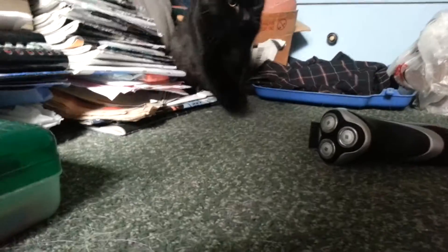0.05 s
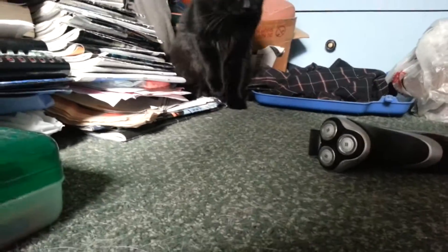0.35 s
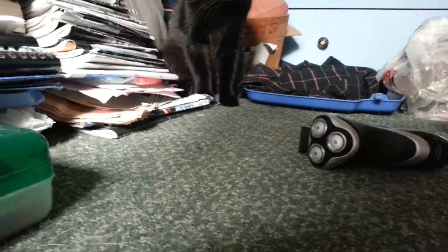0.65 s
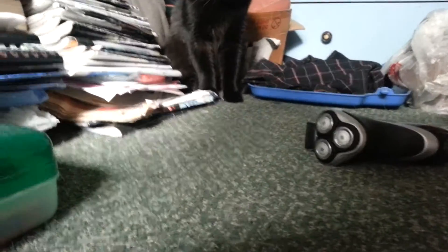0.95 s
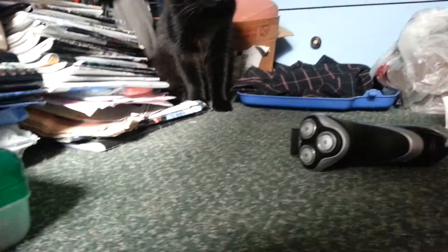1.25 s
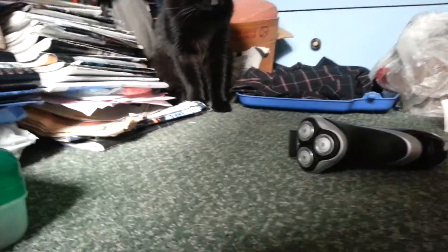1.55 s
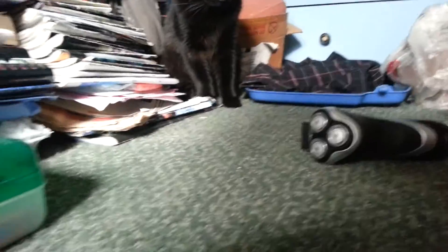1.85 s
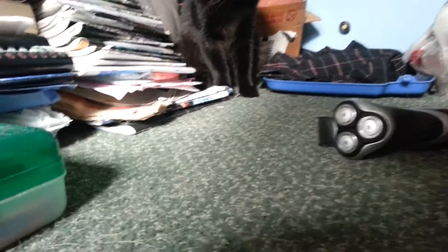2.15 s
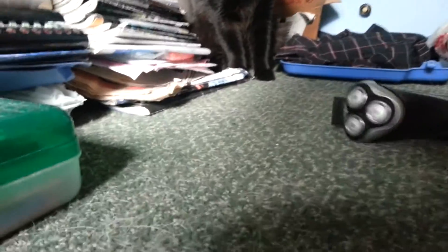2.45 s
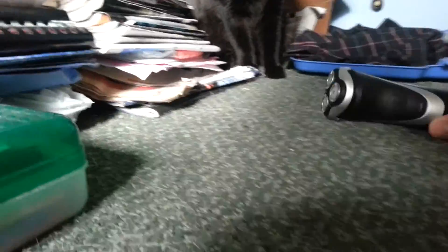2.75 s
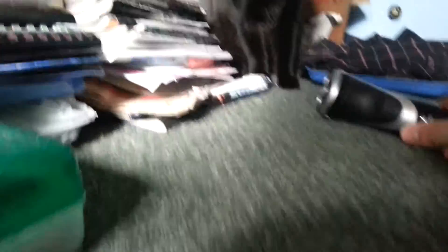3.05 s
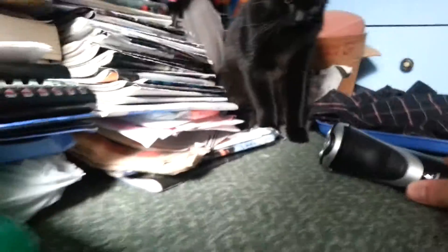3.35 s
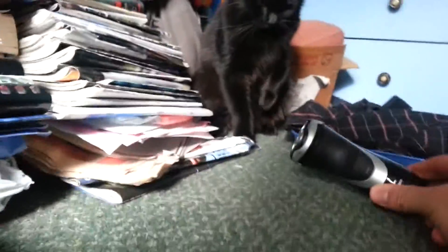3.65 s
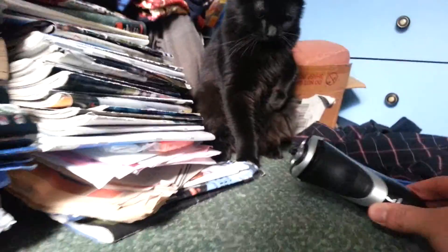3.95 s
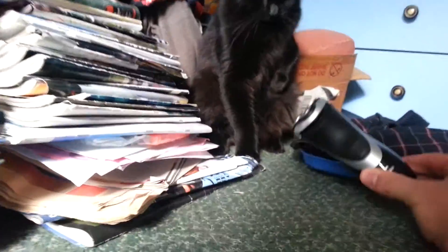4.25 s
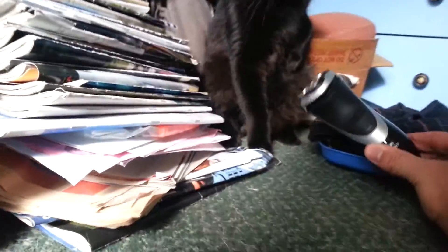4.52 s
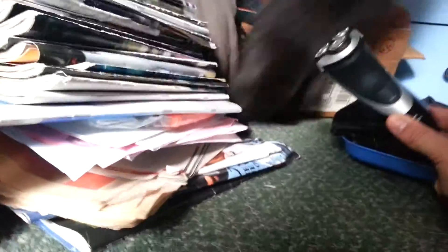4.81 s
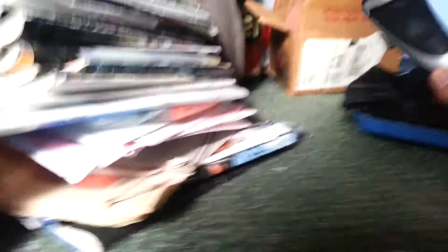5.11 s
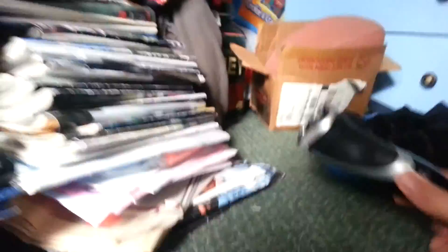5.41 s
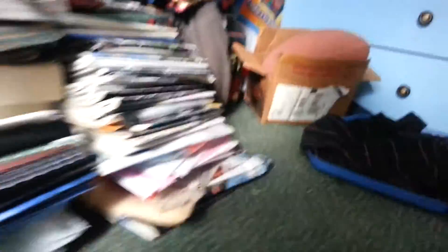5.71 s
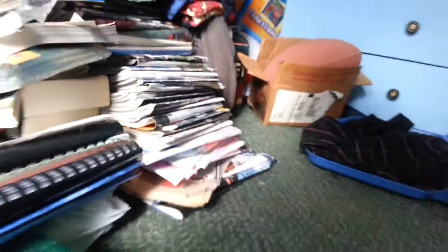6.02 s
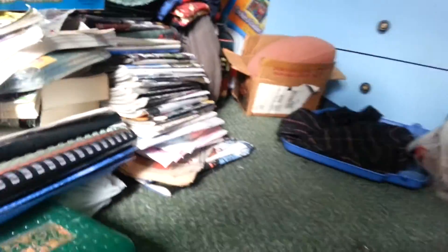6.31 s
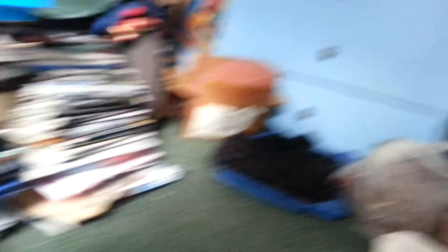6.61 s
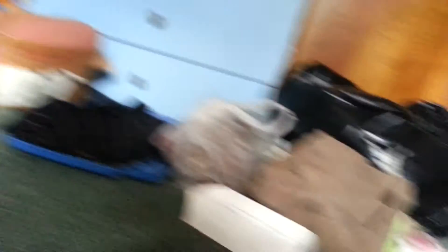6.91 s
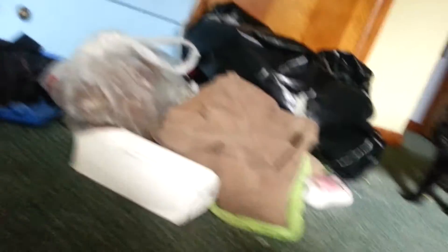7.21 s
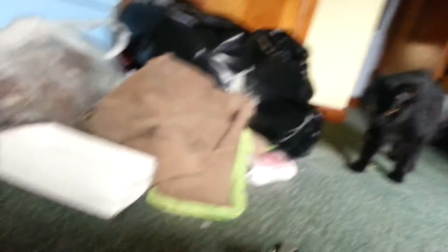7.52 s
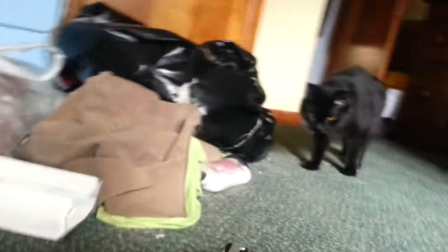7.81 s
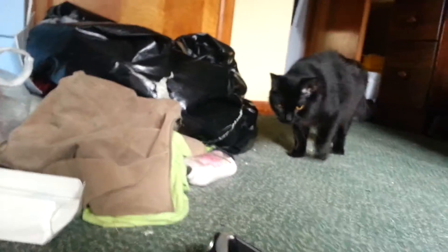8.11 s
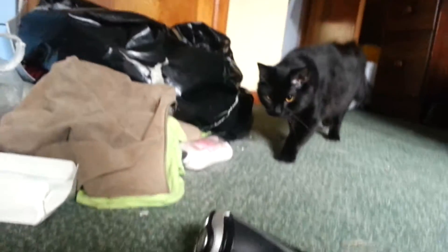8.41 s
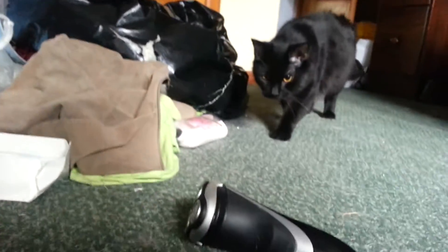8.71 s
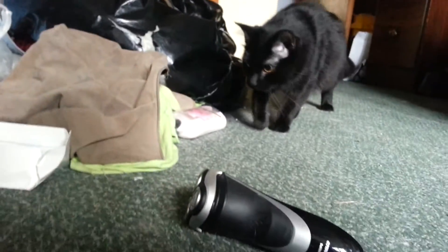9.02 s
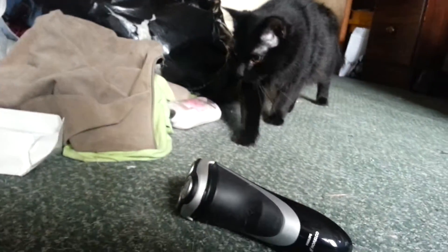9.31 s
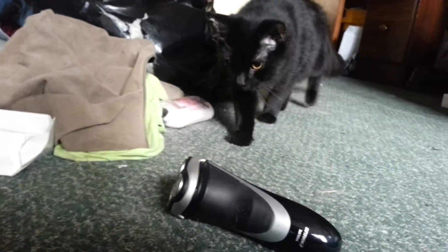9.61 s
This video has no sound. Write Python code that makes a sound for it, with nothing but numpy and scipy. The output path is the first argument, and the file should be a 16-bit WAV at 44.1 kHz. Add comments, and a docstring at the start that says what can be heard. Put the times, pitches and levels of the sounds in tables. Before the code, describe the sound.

A raspy electric shaver runs, gets louder after a clatter of close knocks, and stops, followed by soft swishes and handling clicks.

```python
"""A rotary shaver buzzes on a carpet in a small cluttered room: its blades catch twice a turn, each catch
a beat and a rasp, while the gears whine and the housing and steel caps ring. It is picked up and held
towards a cat, which pads away. Loud knocks and a scrape jolt the microphones; the shaver passes close by
and is switched off. A low room hum, soft swishes and a few small handling clicks remain."""
import sys
import numpy as np
from scipy import signal
from scipy.fft import rfft, irfft, next_fast_len
from scipy.io import wavfile
from scipy.ndimage import map_coordinates

SR = 44100
rng = np.random.default_rng(int(sys.argv[2]) if len(sys.argv) > 2 else 0)


def master(y):
    """Save y as 16-bit WAV."""
    cut = np.clip(np.atleast_2d(y).T, -1, 1)
    pcm = np.round(cut * 32767)  # scale
    wavfile.write(sys.argv[1], SR, pcm.astype(np.int16))


N = 426006
TIME = np.arange(N) / SR


def gain_of(db):
    """Decibels to gain."""
    return 10 ** (np.asarray(db) / 20)


def unit_rms(x):
    """Scales to unit rms."""
    return x / np.sqrt(np.mean(x ** 2) + 1e-20)


def eq_at(points, hz):
    """Reads a spectrum table on a log-frequency axis."""
    f, value = np.transpose(points)
    return np.interp(np.log(hz + 1), np.log(f + 1), value)


def curve(rows, column=1):
    """One column of an automation table at every sample."""
    columns = np.transpose(rows)
    return np.interp(TIME, columns[0], columns[column])


def drift(rate):
    """Random wander of unit size, with `rate` new values a second."""
    return unit_rms(np.interp(TIME * rate, np.arange(N), rng.standard_normal(N)))


def swells(movements):
    """Envelope of movements that rise, hold and fade; where they overlap, their powers add."""
    power = np.zeros(N)
    for start_s, rise_s, hold_s, fade_s, db in movements:
        age = TIME - start_s
        fade = np.exp(-np.maximum(age - rise_s - hold_s, 0) / fade_s)
        power += (gain_of(db) * np.clip(age / rise_s, 0, 1) * fade) ** 2
    return np.sqrt(power)


def add(mix, s, sound):
    """Mixes a stereo sound in at time s."""
    part = mix[:, round(s * SR):][:, :sound.shape[1]]
    part += sound[:, :part.shape[1]]


def delayed(x, delay_s):
    """One channel through a moving delay."""
    return map_coordinates(x, [(TIME - delay_s) * SR], order=3)


def highpass(x, hz):
    """Third-order low cut."""
    return signal.sosfilt(signal.butter(3, hz, "high", fs=SR, output="sos"), x)


def colour(x, db_at, size=4096):
    """Minimum-phase EQ whose gain in dB is the function db_at of frequency."""
    hz = abs(np.fft.fftfreq(size, 1 / SR))
    log_gain = np.log(gain_of(np.maximum(db_at(hz), -100)))
    taps = np.fft.ifft(np.exp(signal.hilbert(log_gain).conj())).real
    return signal.oaconvolve(x, taps[None], axes=1)[:, :x.shape[1]]


def ring(x, hz, width_hz):
    """One steady resonance."""
    return signal.lfilter(*signal.iirpeak(hz, hz / width_hz, SR), x)


def gliding_ring(x, hz, widths_hz):
    """A moving resonance: shift its centre down to zero, smooth once for each width, and shift back."""
    carrier = np.exp(2j * np.pi * np.cumsum(hz) / SR)
    band = x * carrier.conj()
    for pole in np.exp(-np.pi * np.array(widths_hz) / SR):
        band = signal.lfilter([1 - pole], [1, -pole], band)
    return 2 * (carrier * band).real


# Stereo image of the noises. Each row: frequency in Hz, left-right correlation.
STEREO_LIKENESS = [(30, .7), (90, .96), (200, .94), (450, .6), (1000, .1), (4000, .1), (12000, .03)]
def noise(tone):
    """Coloured noise at two microphones, centred in the bass and wide in the treble."""
    size = next_fast_len(N)
    hz = np.fft.rfftfreq(size, 1 / SR)
    mid, side = rfft(rng.standard_normal((2, size)))
    likeness = eq_at(STEREO_LIKENESS, hz)
    mid, side = mid * np.sqrt(1 + likeness), side * np.sqrt(1 - likeness)
    spectrum = np.array([mid + side, mid - side]) * gain_of(eq_at(tone, hz))
    return unit_rms(irfft(spectrum, size)[:, :N])


def room(x, t60_s=0.12, size=12000):
    """Carpet and clutter leave a short, sparse tail."""
    t = np.arange(size) / SR
    echoes = rng.standard_normal((2, size)) * (rng.random((2, size)) < .05)
    taps = echoes * (t > .003) * gain_of(-60 * t / t60_s)
    return signal.oaconvolve(x, taps / np.linalg.norm(taps[0]), axes=1)[:, :N]


# Colour of the room's air. Each row: frequency in Hz, gain in dB.
AIR_TONE = [(15, -55.5), (25, -64), (63, -5.5), (134, -10.5), (184, -5), (358, -8), (480, -16.5),
            (1550, -18.5), (4380, -21), (6350, -25.5), (13000, -23.5), (14500, -30)]
# The hum comes up as the microphones are raised. Each row: time in seconds, level in dB.
HUM_LEVEL = [(4.2, -68), (5.8, -60), (9.66, -57)]
def room_tone(air_db=-59.5, hum_hz=135, width_hz=20):
    """A bed of faint air and a low, wavering hum of narrow-band noise."""
    hum = ring(ring(noise(AIR_TONE), hum_hz, width_hz), hum_hz, 2 * width_hz)
    return gain_of(air_db) * noise(AIR_TONE) + unit_rms(hum) * gain_of(curve(HUM_LEVEL))


# Dull shuffles on the carpet, swishes as the shaver is lowered, and a rub into the sharpest click.
# Each row: start, rise, hold and fade in seconds, level in dB.
SHUFFLE_MOVES = [(1.08, 0.084, 0.32, 0.079, -53.5), (3.9, 0.57, .1, .1, -51),
                 (4.86, 0.012, 0.082, 0.053, -43), (5.05, 0.067, 0.74, 0.27, -52),
                 (6.9, 0.058, 0.046, 0.2, -57.5), (8.85, 0.26, 0.054, 0.14, -57)]
SWISH_MOVES = [(6.92, 0.036, 0.023, 0.17, -50), (7.09, 0.083, 0.15, 0.14, -47),
               (7.62, 0.062, 0.051, 0.026, -54)]
RUB_MOVES = [(1.402, .004, 0.014, .01, -43), (1.425, 0.018, 0.014, 0.0028, -36.5)]
# Their colours. Each row: frequency in Hz, gain in dB.
SHUFFLE_EQ = [(40, -39), (100, -11), (170, -3.5), (280, -3), (450, -7), (800, -10.5), (3000, -30)]
SWISH_EQ = [(150, -29), (250, -4), (368, -1.5), (560, 1.5), (1000, -2.5), (2830, -6), (3640, -2),
            (6670, -13), (14000, -25)]
RUB_EQ = [(300, -11), (800, -2), (2000, -3), (4500, 0), (7000, -3), (14000, -9)]
def rustles(stir_running_db=-58, stir_after_db=-63.5, lumps_db=2.0):
    """Light friction: lumpy shuffling over a faint stir, smooth swishes and a crisp rub."""
    stir = gain_of(stir_after_db + (stir_running_db - stir_after_db) * motor_gain())
    lumpy = noise(SHUFFLE_EQ) * unit_rms(gain_of(lumps_db * drift(rate=45)))
    shuffle = lumpy * np.hypot(stir, swells(SHUFFLE_MOVES))
    return shuffle + noise(SWISH_EQ) * swells(SWISH_MOVES) + noise(RUB_EQ) * swells(RUB_MOVES)


# Two strokes across the microphones. Each row: start, rise, hold and fade in seconds, gain in dB.
SCRAPE_STROKES = [(5.23, 0.018, 0.058, 0.08, -19.5), (5.358, 0.026, 0.11, 0.042, -15)]
# Colour of the grains. Each row: frequency in Hz, gain in dB.
SCRAPE_EQ = [(30, -39), (80, -4), (130, -4), (195, 6), (260, -0.5), (400, 0.5), (640, -1), (950, -1.5),
             (1600, -4), (2500, -0.5), (4500, -1), (6500, -6), (14000, -8)]
def scrape(bright_hz=1800, dull_hz=382, slows_at_s=5.45, slowing_s=0.011, grain_db=2.0, lag_samples=12):
    """Stick-slip grains that dull as the rubbing slows and reach the right side late."""
    grains = unit_rms(noise(SCRAPE_EQ) * gain_of(grain_db * np.clip(drift(rate=530), -2, 2)))
    hz, t, spectra = signal.stft(grains, SR, nperseg=256)
    speed = (1 - np.tanh((t - slows_at_s) / slowing_s / 2)) / 2
    corner_hz = dull_hz + (bright_hz - dull_hz) * speed
    dulled = spectra / np.sqrt(1 + (hz[:, None] / corner_hz) ** 2)
    left, right = signal.istft(dulled, SR, nperseg=256)[1][:, :N]
    return np.array([left, np.roll(right, lag_samples)]) * swells(SCRAPE_STROKES)


def burst(db, hz, rise_s):
    """A few cycles that swell and die away: a padded thump when low, a steel snap when high."""
    t = np.arange(4000) / SR
    envelope = (t / rise_s * np.exp(1 - t / rise_s)) ** 2
    return gain_of(db) * envelope * np.sin(2 * np.pi * hz * t) * np.ones((2, 1))


def tink(db, hz, t60_s=0.02):
    """A small hard part rings briefly at one pitch."""
    t = np.arange(4000) / SR
    return gain_of(db - 60 * t / t60_s) * np.sin(2 * np.pi * hz * t) * np.ones((2, 1))


def strike(body_db, body_hz, width_hz, crack_db, crack_hz, decay_s, pan_db, snap_db=-17, push_db=-19):
    """A blow with a brief rattle rings a body resonance and a bright crack, over a dull push."""
    t = np.arange(6000) / SR
    rattles = rng.standard_normal((3, len(t))) * np.exp(-t / decay_s) * .12
    blow, wide_rattle = rattles[0] + (t == 0), rattles[1:]
    body = ring(blow + wide_rattle * min(body_hz / 1200, 1), body_hz, width_hz)
    body = ring(body, body_hz, 2 * body_hz)
    body += gain_of(push_db) * ring(blow, hz=300, width_hz=500)
    chatter = blow + 10.0 * wide_rattle
    crack = ring(ring(chatter, crack_hz, width_hz=1300), crack_hz, width_hz=3900)
    crack += gain_of(snap_db) * ring(chatter, hz=6500, width_hz=4900)
    sound = gain_of(body_db) * body / abs(body).max() + gain_of(crack_db) * crack / abs(crack).max()
    return sound * gain_of([[pan_db / 2], [-pan_db / 2]])


# Round thumps on the carpet and the microphones.
# Each row: start in seconds, level in dB, pitch in Hz, rise in seconds.
SOFT_THUMPS = [(0.851, -42, 320, .004), (0.912, -36.5, 313, .004), (4.772, -35, 276, .004),
               (4.865, -38, 237, 0.0041), (4.935, -33, 280, .004), (5.275, -21, 435, 0.0035),
               (5.373, -28, 105, 0.0066), (5.438, -23, 200, 0.0063), (5.502, -19.5, 135, 0.0037),
               (7.03, -40.5, 238, 0.0052), (9.036, -48, 330, .003)]
# Close by, single blade catches snap harder. Each row: start in seconds, level in dB, pitch in Hz.
BLADE_SNAPS = [(5.76, -25, 4380), (5.785, -23, 4440), (5.809, -18, 4560), (6.1545, -26, 4670),
               (6.3764, -25, 3230), (6.4009, -26, 3300), (6.5842, -29, 4420), (6.698, -28, 4580),
               (6.8105, -26, 4430)]
# Knocks on the microphones. Each row: start in seconds, body in dB and Hz, crack in dB and Hz.
HARD_KNOCKS = [(5.242, -13, 1850, -13.5, 4750), (5.2785, -11.5, 1570, -12.5, 2970),
               (5.288, -15, 800, -28, 3000), (5.311, -17.5, 3970, -21, 13300),
               (5.3541, -24, 1020, -15.5, 3680), (5.383, -13.5, 980, -28, 3500),
               (5.394, -10.5, 870, -22, 3500), (5.411, -12.5, 960, -15, 3480),
               (5.441, -13.5, 800, -16, 4020), (5.469, -16, 597, -21, 3500)]
# Small things being handled. Each row: start in seconds, body in dB and Hz, body width in Hz,
# crack in dB and Hz, rattle decay in seconds, left over right in dB, ring in dB and Hz.
HANDLING_CLICKS = [(1.4132, -28, 1000, 600, -16, 3970, 0.002, 3, -44, 4150),
                   (1.4614, -25, 930, 500, -10.5, 4100, 0.0017, 2, -41, 4100),
                   (3.477, -50, 1500, 900, -25, 5940, .001, -3, -42, 5850),
                   (6.953, -23.5, 1430, 700, -24, 4700, 0.0011, 3, -32.5, 1280),
                   (7.038, -42, 1230, 300, -37, 3500, 0.002, -9, -30, 1250),
                   (7.047, -46, 1500, 500, -31.5, 3670, 0.0027, 4, -46, 4350),
                   (7.633, -36.5, 323, 300, -42.5, 3900, 0.0013, 20, -62, 4300),
                   (7.717, -42, 1100, 1000, -46, 2000, 0.0036, 0, -58, 1200),
                   (8.211, -38.5, 795, 900, -64, 2000, 0.0031, 0, -66, 1800),
                   (8.643, -43.5, 400, 400, -44, 4900, 0.0026, 2, -66, 4350),
                   (9.0368, -34.5, 1200, 1200, -36, 4300, 0.00055, 6, -39, 1785),
                   (9.1415, -35, 1280, 1400, -34, 4300, 0.006, -0.5, -40, 4380)]
def impacts(room_db=-8.5):
    """Thumps are all body and blade snaps all crack; knocks and clicks have both."""
    out = np.zeros((2, N))
    for s, *thump in SOFT_THUMPS:
        add(out, s, burst(*thump))
    for s, db, hz in BLADE_SNAPS:
        add(out, s, burst(db, hz, rise_s=.0007))
    for s, body_db, hz, crack_db, crack_hz in HARD_KNOCKS:
        add(out, s, strike(body_db, hz, 0.29 * hz, crack_db, crack_hz, decay_s=0.0031, pan_db=2.5))
    for s, *click, ring_db, ring_hz in HANDLING_CLICKS:
        add(out, s, strike(*click, snap_db=-15.5))
        add(out, s, tink(ring_db, ring_hz))
    return out + gain_of(room_db) * room(highpass(out, 250))


def motor_turns(full_speed_hz=40.529, shortfall_hz=.849, settle_s=2.12):
    """Running count of cutter turns as the motor creeps up to full speed."""
    return np.cumsum(full_speed_hz - shortfall_hz * np.exp(-(TIME / settle_s) ** 2)) / SR


def motor_gain(off_s=6.83, fade_db_per_s=133):
    """Full level until the motor is switched off, then a fast fade."""
    return gain_of(-fade_db_per_s * np.maximum(TIME - off_s, 0))


def hollow_shell(decay_s=.002, direct=.1, size=1600):
    """The shell smears a pulse, differently on each side, and keeps its spectrum flat."""
    decay = np.exp(-np.arange(size) / SR / decay_s)
    smear = unit_rms(rng.standard_normal((2, size)) * decay) / np.sqrt(size)
    smear[:, 0] += direct
    spectrum = rfft(smear)
    return irfft(spectrum / abs(spectrum))[:, :size // 2]


# The two catches in a turn, the main one first. Each row: place in the turn from 0 to 1,
# beat gain in dB, beat low cut in Hz, rasp gain in dB, lead of the rasp in seconds.
BLADE_CATCHES = [(.285, 5, 497, -3, 0.0033), (.82, 3.5, 1620, 1, 0.0013)]
MAIN_CATCH = BLADE_CATCHES[0][0]
def blades(turns, slide_db, jitter_s=.00002, catch_s=0.00087, tick_db=6.5, tick_lag_s=0.00095, alike=0.3):
    """Each catch gives a beat of the same shape and a burst of rasp; the blades slide softly between."""
    beat, power = np.zeros((2, N)), np.zeros(N)
    age = np.arange(SR // 50) / SR / catch_s
    grind_shape = age ** 2 * np.exp(-age) / 2
    for place, beat_db, low_hz, rasp_db, lead_s in BLADE_CATCHES:
        when = np.interp(np.arange(int(turns[-1]) - 2) + place, turns, TIME)
        late, strong, loose, harsh = np.clip(rng.standard_normal((len(when), 4)), -2, 2).T
        at = (when + jitter_s * late) * SR
        force = gain_of(beat_db + 1.5 * strong)
        sample, fraction = at.astype(int), at % 1
        pulses = np.bincount(sample, force * (1 - fraction), N)
        pulses += np.bincount(sample + 1, force * fraction, N)
        beat += signal.oaconvolve(highpass(pulses, low_hz)[None], hollow_shell(), axes=1)[:, :N]
        # the blade starts to grind just before it snaps free, a little differently each turn
        grind_at = abs((when - lead_s + .0003 * loose) * SR).astype(int)
        grinds = np.bincount(grind_at, gain_of(rasp_db + .8 * harsh) ** 2, N)
        power += signal.oaconvolve(grinds, grind_shape)[:N]
    envelope = np.sqrt(abs(power))
    centre = np.sqrt(alike) * rng.standard_normal((3, 1, N))
    grind, caps, slide = centre + np.sqrt(1 - alike) * rng.standard_normal((3, 2, N))
    # only the catches are hard enough to make the steel caps tick, a moment later
    ticks = ring(caps * np.interp(TIME - tick_lag_s, TIME, envelope), hz=4700, width_hz=800)
    return beat, envelope * grind + gain_of(tick_db) * ticks + gain_of(slide_db) * slide


# The grip shifts the housing's ring. Each row: time in seconds, pitch in Hz.
HOUSING_GLIDE = [(5, 1266), (5.7, 1235), (6.5, 1215), (6.72, 1370)]
# Its level as the shaver is turned and gripped. Each row: time in seconds, level in dB.
HOUSING_LEVEL = [(0, -54), (1.1, -49.5), (1.7, -46), (2.3, -48), (2.85, -45), (3.6, -46.5), (4.4, -51),
                 (5.2, -53), (5.7, -50), (6.05, -54), (6.3, -62), (6.5, -53), (6.8, -51)]
def housing(turns, width_hz=34, onset_width_hz=500, spread_db=0.9, lag_samples=7):
    """Each main catch rings the plastic housing: a throbbing whine that reaches the right side late."""
    kicks = np.diff(np.floor(turns - MAIN_CATCH), prepend=-1) * gain_of(spread_db * drift(rate=40))
    whine = unit_rms(gliding_ring(kicks, curve(HOUSING_GLIDE), [width_hz, onset_width_hz]))
    return np.array([whine, np.roll(whine, lag_samples)]) * gain_of(curve(HOUSING_LEVEL)) * motor_gain()


# The caps' song comes and goes with the angle of the head. Each row: time in seconds, level in dB.
CAPS_LEVEL = [(0, -54.5), (1.2, -54), (1.7, -51.5), (2.5, -52), (2.8, -63), (4, -62), (4.4, -55),
              (4.95, -49), (5.2, -56), (5.68, -45), (5.78, -52), (5.9, -49), (6, -58), (6.11, -45),
              (6.21, -58), (6.36, -54), (6.6, -63)]
def steel_caps(rasp, hz=3345, width_hz=70, waver_db=0.5, wander_hz=18):
    """The grinding keeps the thin steel caps singing, wavering in level and pitch."""
    waver = gain_of(waver_db * drift(rate=2.84))
    song = gliding_ring(rasp, hz + wander_hz * drift(rate=4), [width_hz, 2 * width_hz])
    return motor_gain() * gain_of(curve(CAPS_LEVEL)) * waver * unit_rms(song)


# How the shaver is turned. Each row: time in seconds, pose (0 lying, 1 lifted, 2 held out, 3 close by).
POSE_PATH = [(1.1, 0), (2.1, .4), (2.6, 1), (3.05, 1.1), (3.6, 1.8), (4.4, 2), (5.5, 2.05), (5.85, 2.9),
             (6.5, 3), (6.75, 2.1)]
def by_pose(values):
    """Crossfades four values, one for each pose, as the shaver moves."""
    return np.interp(curve(POSE_PATH), np.arange(len(values)), values)


# Gear and motor tones. Each row: multiple of the cutter speed (played rounded to a whole number),
# then level in dB for each of the four poses.
GEAR_TONES = [(12, -58, -60, -61.5, -57.5), (49, -51.5, -59, -72, -75), (51, -53.5, -51, -58, -75),
              (57, -54.5, -74, -61, -55), (61, -54.5, -74, -54, -47.5), (82.5, -50, -53.5, -49, -56)]
def gears(turns, beat_gain, full_above_db=-44.0, waver_db=1.6):
    """Whines locked to the shaft throb together just after the main catch and fade with a weak beat."""
    shaft = turns - MAIN_CATCH - .07 + 0.0012 * drift(rate=25)
    running = np.minimum(beat_gain / gain_of(full_above_db), 1)
    lead_cycles = np.array([[.22], [0]])  # each tone reaches the left side first
    out = np.zeros((2, N))
    for multiple, *levels_db in GEAR_TONES:
        level = gain_of(by_pose(levels_db) + waver_db * drift(rate=15))
        out += running * level * np.sin(2 * np.pi * (round(multiple) * shaft + lead_cycles))
    return out


# Resonances of the shaving head. Each row: centre in Hz, width in Hz, boost or cut in dB.
HEAD_RESONANCES = [(1500, 350, 2.5), (2050, 130, 2.5), (2400, 140, -1), (4300, 100, 1), (4650, 860, -5),
                   (7700, 450, 2), (13600, 870, 14)]
def head_db(hz):
    """The head's resonances as bell-shaped EQ bands."""
    return sum(db / (1 + (2 * (hz - centre) / width) ** 2) for centre, width, db in HEAD_RESONANCES)


# Two sweeping peaks in the rasp. Each row: time in seconds, centre in Hz, gain of the added band in dB.
LOW_SWEEP = [(0, 2000, -29), (1.7, 2000, -9), (2.15, 2100, -12), (2.3, 2650, -10), (2.6, 2730, -3),
             (3.05, 3030, -6), (3.3, 3100, -18), (5.55, 2400, -22), (5.75, 2230, -5), (6.02, 2230, -2),
             (6.07, 3250, -2), (6.2, 3280, -9), (6.37, 3270, 0), (6.48, 3130, 0), (6.62, 3070, -9)]
HIGH_SWEEP = [(0, 4700, -26), (1.9, 4650, -14), (2.3, 4400, 0), (2.8, 4600, -22), (3.7, 4840, -11),
              (4.5, 4860, -3), (5.1, 4300, 1), (5.6, 4400, -9.5), (5.72, 4400, 2), (5.81, 4560, 3),
              (5.87, 4300, -14), (5.95, 4080, -8), (6.04, 4730, -19), (6.13, 4800, -5), (6.27, 4730, -1),
              (6.38, 4300, -4), (6.45, 4100, -12), (6.53, 4150, 1), (6.6, 4550, 2), (6.69, 4600, -14)]
def aimed(x, width_hz=360):
    """The turning head aims two moving bands at the listener."""
    for sweep in LOW_SWEEP, HIGH_SWEEP:
        x = x + gain_of(curve(sweep, 2)) * gliding_ring(x, curve(sweep), [width_hz])
    return x


# Two high shelves. Each row: time in seconds, treble gain in dB, further gain of the top sizzle in dB.
TREBLE_SHELVES = [(0, 1.5, 5.5), (2.5, 3, -0.5), (3.3, 2, -4), (4.702, 0, -2), (4.921, 2.5, 6),
                  (5.1, -2, 0), (5.6, 2, -15), (5.8, 2.5, 4), (6.08, 4.5, 1), (6.22, -2.5, 0),
                  (6.45, 2, -5), (6.8, -2, 2)]
def beamed(x, treble_hz=6000, sizzle_hz=12000):
    """The head beams its treble, so the highest bands swell and fade as it turns."""
    for column, hz in enumerate([treble_hz, sizzle_hz], start=1):
        top = signal.sosfiltfilt(signal.butter(3, hz, "high", fs=SR, output="sos"), x)
        x = x + (gain_of(curve(TREBLE_SHELVES, column)) - 1) * top
    return x


# Bounce off the nearest surface. Each row: time in seconds, delay in seconds, gain in dB.
NEAR_BOUNCE = [(0, 0.0022, -33), (2, 0.0019, -14.5), (3, 0.0014, -36), (4.2, 0.0013, -24),
               (5.95, 0.00084, -19), (6.1, 0.001, -26), (6.28, 0.0015, -12), (6.45, 0.0014, -24),
               (6.6, 0.0012, -7), (6.8, 0.0015, -21)]
def reflected(x):
    """One reflection, whose path changes as the shaver moves, combs the buzz with shifting peaks."""
    bounce = np.array([delayed(side, curve(NEAR_BOUNCE)) for side in x])
    return x + gain_of(curve(NEAR_BOUNCE, 2)) * bounce


# Lag of the buzz on the right. Each row: time in seconds, delay in seconds.
RIGHT_LAG = [(0, .00004), (4.9, .00006), (5.6, .00024), (6.25, .00033), (6.8, .00027)]
def from_left(x):
    """The buzz comes from the left, more so as the shaver nears."""
    return np.array([x[0], delayed(x[1], curve(RIGHT_LAG))])


def stereo_tilt(x):
    """The upper mids lean left; the lows and the top lean right."""
    # Each row: frequency in Hz, left over right in dB.
    balance = [(500, -1.5), (1100, -1.5), (2200, 4), (4000, 3.5), (8000, -6.0), (13000, -2.0)]
    left = colour(x[:1], lambda hz: eq_at(balance, hz) / 2)
    right = colour(x[1:], lambda hz: -eq_at(balance, hz) / 2)
    return np.vstack([left, right])


# Colour of the beat, duller than the rasp, then of the whole buzz in each pose.
# Each row: frequency in Hz, gain in dB.
BEAT_EQ = [(300, 1), (650, 1.5), (850, 7), (1030, 7), (1260, -3), (1520, 1), (2200, 3.5), (3400, 0.5),
           (5000, 1), (12000, -18)]
LYING_EQ = [(240, -26.5), (450, -17), (680, -15), (1050, -7), (1600, -8), (2000, -3.5), (2450, -9.5),
            (3200, -3), (3750, -12), (4800, -2), (6350, -16), (8300, -12.5), (11800, -22.5), (14500, -37.5)]
LIFTED_EQ = [(240, -17.5), (450, -12), (750, -13), (1030, -9.5), (1300, -6), (1750, -10.5), (2200, -10.5),
             (2750, -5), (3400, -7.5), (3900, -12), (4700, -5.5), (6300, -18), (8300, -13.5),
             (11800, -22.5), (14500, -36)]
HELD_EQ = [(240, -17), (450, -8.5), (750, -15), (1150, -6), (1750, -11), (2500, -5.5), (3300, -2.5),
           (3800, -4), (4750, 0), (6250, -12.5), (7700, -10), (12000, -21), (14500, -36)]
CLOSE_EQ = [(240, -29), (450, -19.5), (800, -16.5), (1250, -16.5), (1600, -18), (2150, -6), (2800, -5),
            (3330, -4), (4700, -3), (6000, -13.5), (7700, -15), (12000, -25.5), (14500, -40)]
# Balance against the rasp, pose by pose. Each row: beat in dB, hiss between catches in dB.
POSE_BALANCE = [(0, -8.5), (-1, -8), (-6.5, -9.5), (-9.5, -11)]
# Fader ride as the shaver moves and passes close by. Each row: time in seconds, gain in dB.
BUZZ_FADER = [(0, -42.5), (1.6, -41.5), (3.2, -43.5), (3.6, -40.5), (4.9, -40.5), (5.55, -36),
              (5.78, -33.5), (6.1, -33), (6.2, -35), (6.36, -35), (6.5, -36.5), (6.68, -40.5),
              (6.81, -38.5)]
def shaver(room_db=-12):
    """Beat and rasp leave the head coloured by its pose; housing, caps and gears ring along."""
    turns = motor_turns()
    beat_db, slide_db = map(by_pose, np.transpose(POSE_BALANCE))
    beat, rasp = blades(turns, slide_db)
    beat = colour(beat, lambda hz: eq_at(BEAT_EQ, hz))
    beat = colour(beat, head_db)
    rasp = aimed(colour(rasp, head_db))
    rasp_gain = gain_of(curve(BUZZ_FADER)) * motor_gain()
    beat_gain = rasp_gain * gain_of(beat_db)
    pose = curve(POSE_PATH)
    buzz = np.zeros((2, N))
    for k, tone in enumerate([LYING_EQ, LIFTED_EQ, HELD_EQ, CLOSE_EQ]):
        crossfade = np.maximum(1 - abs(pose - k), 0)
        for layer, gain in (beat, beat_gain), (rasp, rasp_gain):
            buzz += crossfade * gain * unit_rms(colour(layer, lambda hz: eq_at(tone, hz)))
    buzz = from_left(reflected(beamed(buzz)))
    buzz += gain_of(room_db) * room(buzz)
    return stereo_tilt(buzz + housing(turns) + steel_caps(rasp) + gears(turns, beat_gain))


def scene():
    """The full mix; the small microphones barely take the deepest part of the blows."""
    return shaver() + highpass(impacts() + scrape(), 82) + rustles() + room_tone()


def record(dry, cutoff_hz=14800):
    """A steep high cut on the whole mix."""
    taps = signal.firwin(511, cutoff_hz, window=("kaiser", 9), fs=SR)
    return signal.oaconvolve(dry, taps[None], "same")


dry = scene()
out = record(dry)
master(out)
```